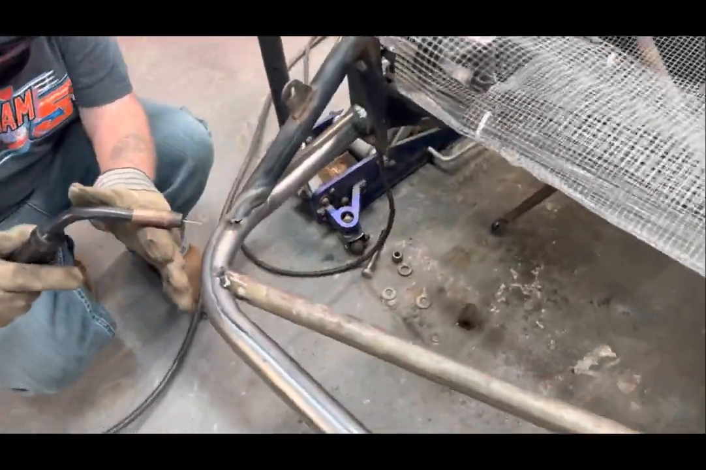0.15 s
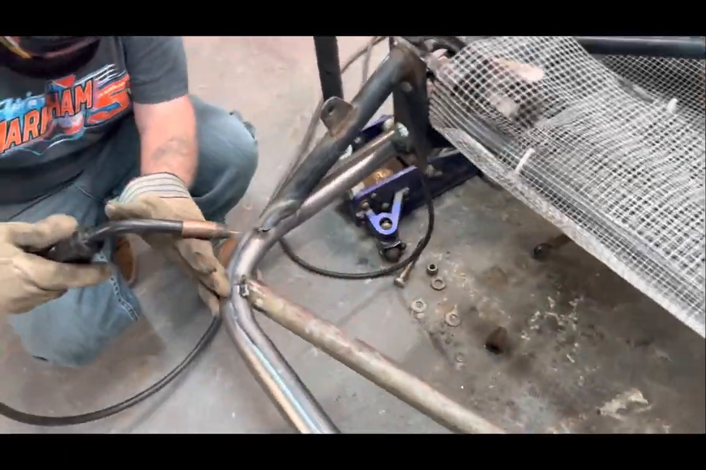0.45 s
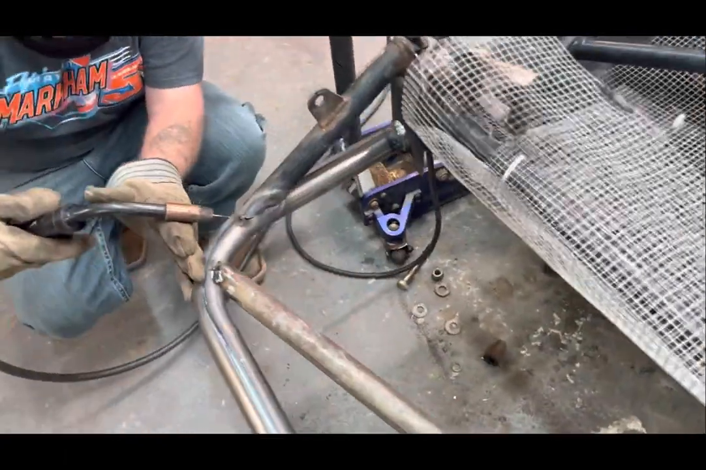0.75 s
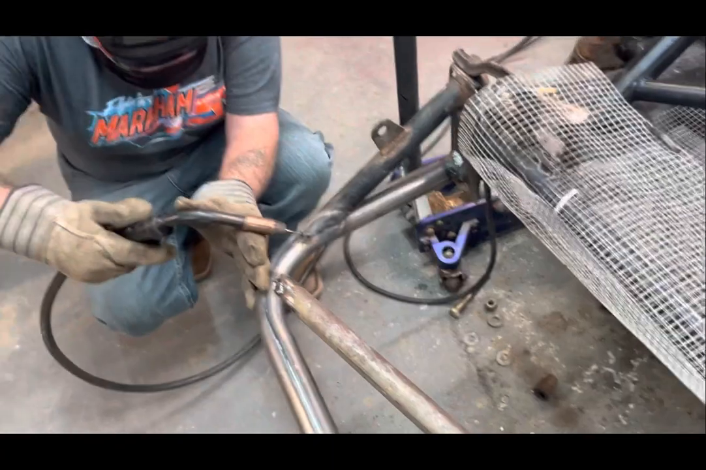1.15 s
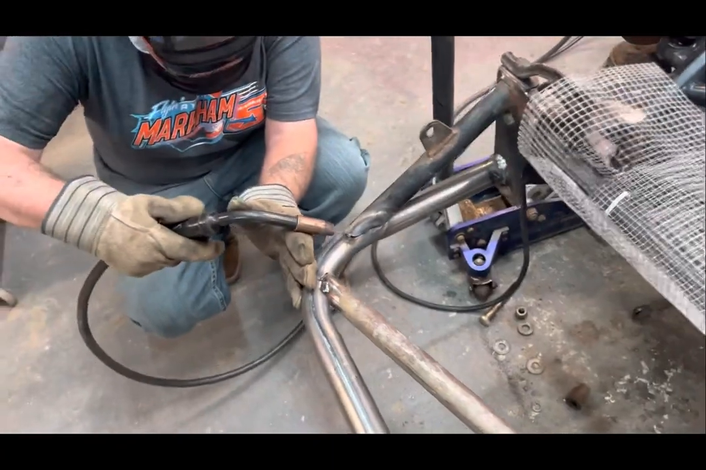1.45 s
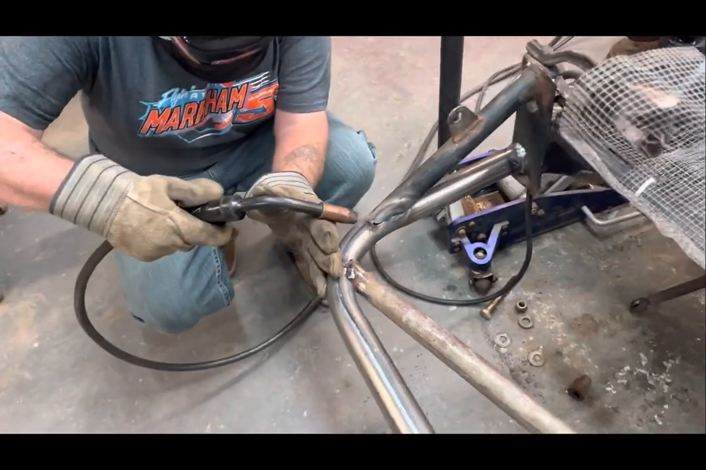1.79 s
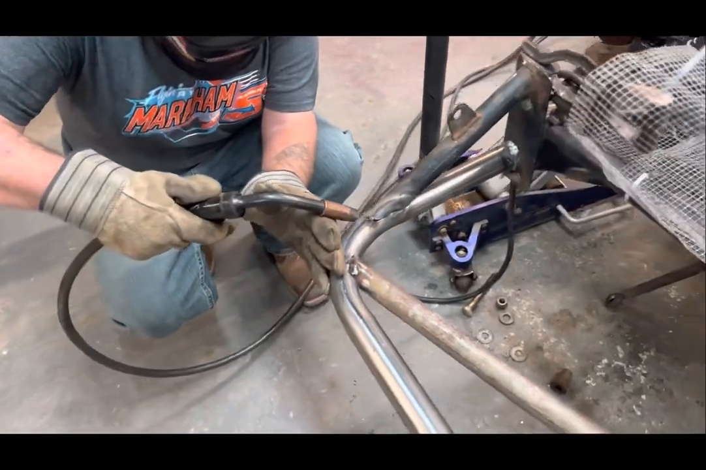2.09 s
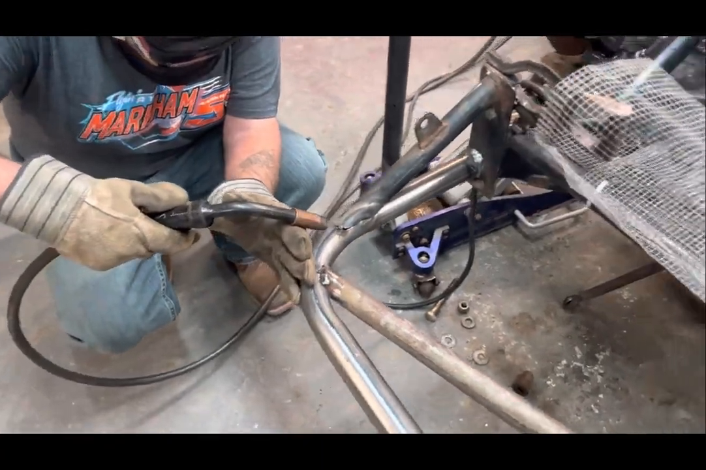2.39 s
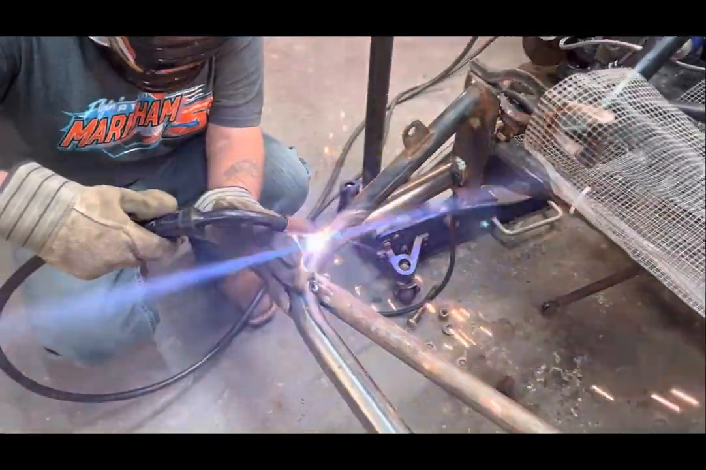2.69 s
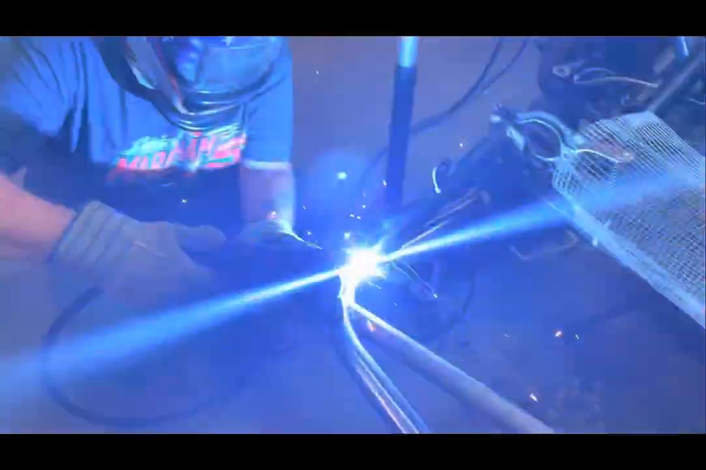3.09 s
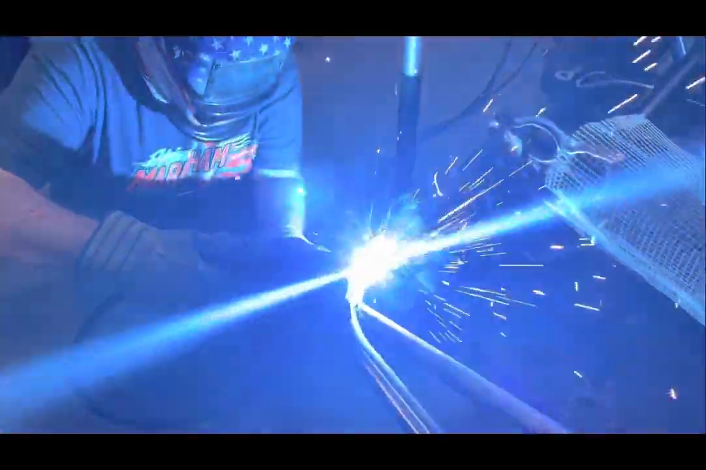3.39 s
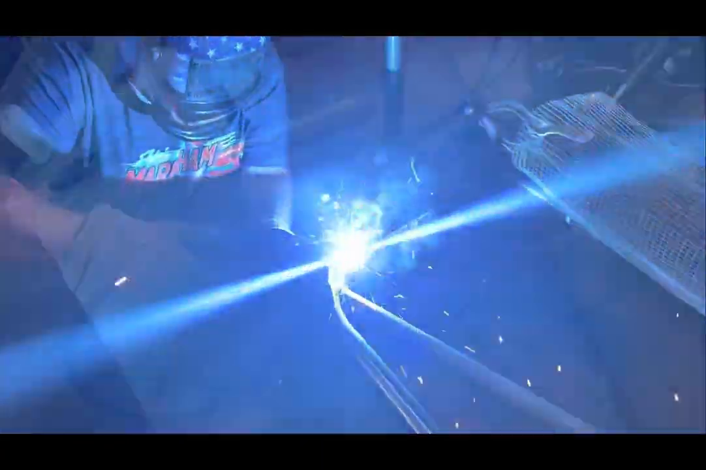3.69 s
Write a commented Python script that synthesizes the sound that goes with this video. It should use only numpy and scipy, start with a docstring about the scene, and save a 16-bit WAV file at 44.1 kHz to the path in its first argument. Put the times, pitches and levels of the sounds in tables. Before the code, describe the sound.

Welding arc on steel tubing, heard close in stereo: quiet humming for over two seconds, slight rubbing, then a burst, hissing sputter, dense ragged clicks and low microphone thumps with short room reverberation.

```python
"""Welding in a workshop, close to the arc

A welder's fan and transformer hum run from the start: air noise and slowly wavering tones.
Gloves and cable rub as bands of treble noise; a small metal part rings. The wire strikes with a burst,
then short circuits snap in irregular runs, ragged clicks over the sputtering hiss of the arc.
Low thumps shake the microphone, puffs of air push its two ports apart, and the shop reverberates."""
import sys
import numpy as np
from scipy import signal
from scipy.fft import rfft, irfft
from scipy.io import wavfile
from scipy.ndimage import uniform_filter1d

SR = 44100
rng = np.random.default_rng(int(sys.argv[2]) if len(sys.argv) > 2 else 0)


def master(y):
    """Save y as 16-bit WAV."""
    cut = np.clip(np.atleast_2d(y).T, -1, 1)
    pcm = np.round(cut * 32767)  # scale
    wavfile.write(sys.argv[1], SR, pcm.astype(np.int16))


def rack_gain(trim_db):
    """Turn a fader trim in dB into the linear factor to multiply a signal by."""
    fader = np.asarray(trim_db, float)
    return 10 ** (fader / 20)


N = 169785  # length in samples


def evened(x):
    """Scales a signal to unit rms."""
    return x / np.sqrt(np.mean(x ** 2) + 1e-20)


def read(points, hz):
    """Reads a table at the given frequencies, on a log-frequency axis."""
    f, value = np.transpose(points)
    return np.interp(np.log(hz + 1), np.log(f + 1), value)


def follow(curve):
    """Gain over time along a curve of seconds and dB."""
    return rack_gain(np.interp(np.arange(N) / SR, *np.transpose(curve)))


def swell(start, rise, hold, t60):
    """Linear rise, hold, then exponential decay by 60 dB in t60; all in seconds."""
    t = np.arange(N) / SR - start
    return np.clip(t / rise, 0, 1) * rack_gain(-60 * np.maximum(t - rise - hold, 0) / t60)


# How alike left and right arrive at the microphone. Each row: frequency in Hz, likeness from 0 to 1.
LIKENESS = [(250, .97), (640, .4), (1800, .7), (3300, .35), (5700, .97), (8500, .75), (12000, .9)]


def alike(x):
    """Blends the second channel towards the first, band by band, keeping the power of unrelated noise."""
    one, other = rfft(x)
    same = read(LIKENESS, np.fft.rfftfreq(N, 1 / SR))
    return np.array([one, same * one + np.sqrt(1 - same ** 2) * other])  # still a spectrum


def noise(spectrum, patchy_db):
    """Two-channel unit-rms noise of a given spectrum, whose level drifts in time-frequency patches."""
    frames = N // 64 + 9
    a, b, c, d, patches = rng.standard_normal((frames, 129, 5)).T
    patches = uniform_filter1d(patches, size=5, axis=0)
    patches = evened(uniform_filter1d(patches, size=40, axis=1))
    grains = np.array([a + 1j * b, c + 1j * d]) * rack_gain(patchy_db * patches)
    x = signal.istft(grains, nperseg=256, noverlap=192)[1][:, :N]
    color = rack_gain(read(spectrum, np.fft.rfftfreq(N, 1 / SR)))
    return evened(irfft(alike(x) * color, N))


# Transformer and fan tones. Each row: frequency in Hz, width of the waver in Hz, rms in dB before HUM_SWING.
HUM_TONES = [(119.1, 1.38, -41), (162.8, 4.1, -40.5), (320.5, 9.6, -48)]
# Color of the fan's air. Each row: frequency in Hz, relative level in dB.
FAN_AIR = [(40, -23.5), (130, -4), (260, -17.5), (950, -22), (1300, -29.5), (3000, -37), (15000, -70)]
# Swing of the whole hum. Each row: time in seconds, gain in dB.
HUM_SWING = [(0, 0.5), (.8, 2.5), (1.3, 0), (2.72, 1.5), (2.8, -15), (2.92, -6), (3.06, -10), (3.17, -2),
             (3.5, -14.5), (3.8, -11.5)]
FAN_AIR_DB = -40  # rms before HUM_SWING


def welder():
    """Fan noise plus tones, each a steady carrier with a narrow-band random waver around it."""
    t = np.arange(N) / SR
    out = rack_gain(FAN_AIR_DB) * noise(FAN_AIR, patchy_db=1.5)
    for hz, width_hz, db in HUM_TONES:
        r = np.exp(-np.pi * width_hz / SR)
        waver = signal.lfilter([1], [1, -2 * r, r * r], rng.standard_normal((2, 2 * N)))
        waver = waver[:, N:]  # the filter has settled
        steady = 2.02 * waver.std() / width_hz
        tone = (steady + waver[0] + 1j * waver[1]) * np.exp(2j * np.pi * hz * t)
        out += rack_gain(db) * evened(tone.real)
    return out * follow(HUM_SWING)


# Gloves and cable rubbing. Each row: start in seconds, hold in seconds, t60 in seconds, level in dB.
RUBS = [(0.537, 0.0045, 0.21, -53), (0.662, 0.072, 0.45, -48), (1.406, 0.014, 0.16, -55.5),
        (1.478, 0.0049, 0.19, -53), (1.662, 0.02, 0.55, -56.5)]
# Color of the rubbing. Each row: frequency in Hz, relative level in dB.
RUB_COLOR = [(2500, -19), (6200, -8.5), (10500, -19.5), (16000, -11.5)]


def rustles():
    """Faint rubbing: noise bursts, mostly treble, that swell faster than they hold."""
    level = sum(rack_gain(db) * swell(s, 0.45 * hold, hold, t60) for s, hold, t60, db in RUBS)
    return level * noise(RUB_COLOR, patchy_db=1.0)


# Taps on a small metal part. Each row: start in seconds, gain in dB on the modes.
METAL_TAPS = [(1.4815, 2), (1.726, 0)]
# Modes of the part. Each row: frequency in Hz, peak in dB before the gain of the tap.
METAL_MODES = [(6100, -56.5), (8050, -62.5)]


def tinks():
    """A tapped metal part rings in a few modes that die together, the same in both channels."""
    t = np.arange(N) / SR
    modes = sum(rack_gain(db) * np.sin(2 * np.pi * hz * t) for hz, db in METAL_MODES)
    return modes * sum(rack_gain(db) * swell(s, rise=0.001, hold=0, t60=0.2) for s, db in METAL_TAPS)


# Hiss of arc and shielding gas. Each row: time in seconds, level in dB before the sputter.
HISS_LEVEL = [(2.504, -110), (2.516, -23), (2.6, -28), (2.733, -39), (2.745, -24), (2.85, -38.5),
              (3.0, -33.5), (3.09, -35), (3.36, -27), (3.385, -26), (3.43, -28), (3.74, -34.5)]
# Color of the hiss. Each row: frequency in Hz, relative level in dB.
HISS_COLOR = [(480, -21), (1150, -18), (3600, -10.5), (5000, -13), (6800, -9.5), (9500, -15), (16000, -8)]


def hiss(lumps):
    """Noise of arc and gas, its level sputtering with the lumps."""
    return follow(HISS_LEVEL) * rack_gain(2.6 * lumps) * noise(HISS_COLOR, patchy_db=2.0)


def crack(spectrum, lag):
    """Short click whose lows trail: each frequency is late by about lag cycles."""
    hz = np.fft.rfftfreq(512, 1 / SR)
    trail = np.exp(-2j * np.pi * lag * np.log(hz + 1))
    return np.roll(irfft(rack_gain(read(spectrum, hz)) * trail), 10)


def add(mix, sound):
    """Mixes a sound in at the start of mix."""
    mix[:, :sound.shape[1]] += sound


# Short circuits breaking, each entry a time in seconds.
SNAP_TIMES = [2.576, 2.5836, 2.7274, 2.8588, 2.8896, 2.9009, 2.9078, 2.9229, 2.9341, 2.9454, 2.9583, 2.9722,
              2.9875, 3.1051, 3.1309, 3.1512, 3.1651, 3.1859, 3.1957, 3.2132, 3.2323, 3.2469, 3.2541,
              3.2682, 3.2761, 3.301, 3.3207, 3.3402, 3.3651, 3.4439, 3.4714, 3.4912, 3.5145, 3.5341, 3.5478,
              3.5864, 3.5974, 3.6095, 3.6353, 3.6478, 3.671, 3.688, 3.7258, 3.8361]
# Further snaps, weaker, each entry a time in seconds.
WEAK_SNAP_TIMES = [2.5168, 2.7198, 2.8483, 2.8684, 2.8792, 2.9153, 3.1819, 3.2233, 3.5707, 3.6204, 3.7107]
# Color of click and fizz. Each row: frequency in Hz, relative level in dB.
SNAP_COLOR = [(400, -16), (1240, -6.5), (1900, -8), (3100, -3), (5000, -4.5), (6400, -2), (9200, -10),
              (16000, -5)]
# Echoes off tubes and floor. Each row: delay in milliseconds, level in dB against the direct click.
NEAR_ECHOES = [(1.75, -15), (3.3, -14), (4.85, -19)]
SNAP_DB, WEAK_SNAP_DB = 3, -3  # energy of the direct click
SIZZLE_DB, SIZZLE_RISE_MS, SIZZLE_FALL_MS = -26.5, 3, 1.25  # gain of the fizz; e-fold times around a snap


def snaps():
    """Each snap is a cluster of sub-sparks heard as a ragged click with echoes, led in by growing fizz."""
    train, fizz = np.zeros((2, N)), np.zeros(N)
    k = np.arange(-16, 16)  # sub-spark offsets in samples
    click = crack(SNAP_COLOR, lag=0.901)
    rows = [(s, SNAP_DB) for s in SNAP_TIMES] + [(s, WEAK_SNAP_DB) for s in WEAK_SNAP_TIMES]
    rag = rng.standard_normal((len(rows), 3, len(k))) * np.exp(-abs(k) / 7.8)
    for (s, db), (both, *own) in zip(rows, rag):
        at = round(s * SR)
        sparks = 5 * (k == 0) + 0.5 * both + 0.6 * np.array(own)  # main spark, shared rag, rag per channel
        spark = signal.oaconvolve(sparks, click[None], axes=1)
        add(train[:, at - 32:], rack_gain(db) * spark / np.linalg.norm(spark, axis=1, keepdims=True))
        fizz[at] = rack_gain(db)
    bounce = np.zeros(SR // 100)
    for ms, db in [(0, 0.0047)] + NEAR_ECHOES:
        bounce[round(ms * SR / 1000)] = rack_gain(db)
    spatter = evened(uniform_filter1d(rng.standard_normal(N), size=30))  # the fizz comes in tiny sparks
    ms = np.linspace(-20, 20, SR // 25)
    shape = np.exp(np.where(ms < 0, ms / SIZZLE_RISE_MS, -ms / SIZZLE_FALL_MS))
    fizz = signal.oaconvolve(fizz, shape, "same") * rack_gain(4.4 * spatter) * noise(SNAP_COLOR, patchy_db=1.5)
    return signal.oaconvolve(train, bounce[None], axes=1)[:, :N] + rack_gain(SIZZLE_DB) * fizz


# Color of the striking burst. Each row: frequency in Hz, relative level in dB.
STRIKE_COLOR = [(60, -23), (130, -6.5), (3300, -14), (6000, -21), (15000, -32.5)]


def strike(lumps):
    """The wire strikes: a burst of noise, sputtering with the lumps, that holds briefly and dies."""
    burst = swell(2.534, rise=0.0011, hold=0.016, t60=0.12)
    return rack_gain(-18 + 2.5 * lumps) * burst * noise(STRIKE_COLOR, patchy_db=-1.0)


def arc():
    """Hiss and striking burst share one random sputter; the snaps lie on top."""
    lumps = evened(uniform_filter1d(rng.standard_normal(N), size=150))
    return hiss(lumps) + strike(lumps) + snaps()


# Thumps that shake the microphone. Each row: start in seconds, level in dB, settled pitch in Hz, t60 in seconds.
SHAKES = [(2.59, -18, 60.5, 0.067), (2.737, -13, 51, 0.34), (2.912, -15.5, 84.5, 0.045),
          (2.933, -18, 46.8, 0.23), (3.027, -28, 50.1, 0.72), (3.372, -21.5, 58, 0.029)]
# Air pushing the microphone ports in opposite ways. Each row: start in seconds, level in dB.
AIR_PUFFS = [(2.724, -11), (2.859, -17), (2.888, -18.5), (3.082, -29.5), (3.488, -26)]


def thumps():
    """Dying low swings whose pitch sags after the push; puffs swing the ports apart."""
    out = np.zeros((2, N))
    rows = [(*row, 0.003, [[1], [1]]) for row in SHAKES]
    rows += [(s, db, 58, 0.16, 0.017, [[-1], [1]]) for s, db in AIR_PUFFS]
    for s, db, hz, t60, sag_s, side in rows:
        t = np.maximum(np.arange(N) / SR - s, 0)
        turns = hz * (t + sag_s * (1 - np.exp(-t / 0.005)))  # starts sharp, settles to hz
        onset = np.minimum(t / 0.00082, 1)
        out -= rack_gain(db - 60 * t / t60) * np.sin(2 * np.pi * turns) * onset * side
    return out


# Reverberation of the workshop. Each row: frequency in Hz, t60 in seconds.
SHOP_T60 = [(1240, 0.39), (4000, 0.23), (11500, 0.01)]


def shop(x):
    """Room tail of sparse random taps, each band dying at its own speed."""
    taps = np.zeros((2, SR // 2))
    slots = np.arange(100, SR // 2 - 20, 20)
    at = slots + rng.integers(0, 20, (2, len(slots)))
    np.put_along_axis(taps, at, rng.choice([-1., 1.], (2, len(slots))), 1)
    hz, t, z = signal.stft(taps, SR, nperseg=256)
    decay = rack_gain(-60 * t / read(SHOP_T60, hz)[:, None])
    tail = signal.istft(z * decay, SR, nperseg=256)[1]
    return signal.fftconvolve(x.mean(0)[None], tail / np.linalg.norm(tail[0]), axes=1)[:, :N]


# Phase between the microphone ports. Each row: frequency in Hz, lead of the left port in radians.
PORT_LEAD = [(300, 0), (950, .7), (4300, -.3), (5600, -6.28), (7500, -6.4), (9500, -7.2), (12000, -9.1)]


def ports(x):
    """Turns the phase of the left port against the right, by frequency."""
    lead = np.exp(1j * read(PORT_LEAD, np.fft.rfftfreq(N, 1 / SR)))
    return np.array([irfft(rfft(x[0]) * lead, N), x[1]])


def scene():
    """All sources at the two microphone ports; the thumps act on the microphone itself."""
    near = arc()
    room = rack_gain(-11.5) * irfft(alike(shop(near)), N)
    return ports(near + room + rustles() + tinks() + welder()) + thumps()


def top_cut(x):
    """Nothing passes above the cut-off."""
    return signal.sosfilt(signal.butter(12, 17000, fs=SR, output="sos"), x)


# Cut by the wind guard. Each row: frequency in Hz, share of the excess wind level in dB that is cut.
GUARD_SHARE = [(250, 0), (450, 0.65), (2500, 0)]
WIND_HZ, WIND_DB = 120, -39  # wind is the port difference below WIND_HZ; threshold of the guard


def record(dry):
    """Wind guard thins the low mids while low air swings the ports apart; rumble filter, band limit."""
    hz, _, z = signal.stft(dry, SR, nperseg=1024)
    wind = abs(z[0] - z[1])[hz < WIND_HZ] ** 2
    wind_db = 10 * np.log10(wind.sum(0) + 1e-12)
    cut_db = read(GUARD_SHARE, hz)[:, None] * np.maximum(wind_db - WIND_DB, 0)
    x = signal.istft(z * rack_gain(-cut_db), nperseg=1024)[1][:, :N]
    x = signal.sosfilt(signal.butter(2, 32, "high", fs=SR, output="sos"), x)
    x = signal.oaconvolve(x, signal.firwin(255, 15800, fs=SR)[None], "same", axes=1)
    return top_cut(x)


dry = scene()
out = record(dry)
master(out)
```